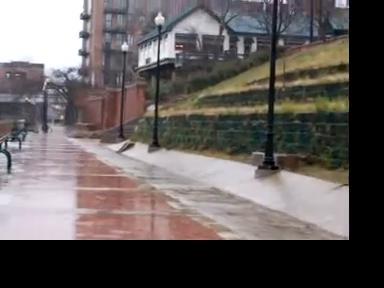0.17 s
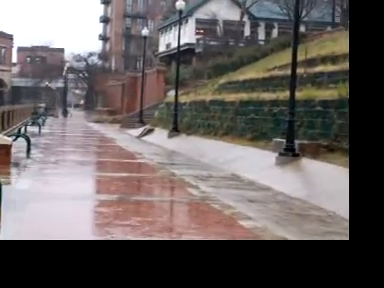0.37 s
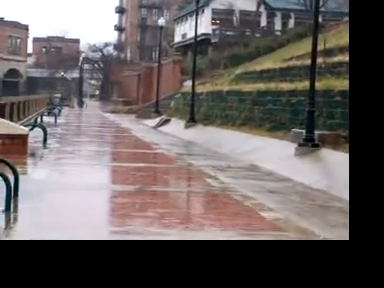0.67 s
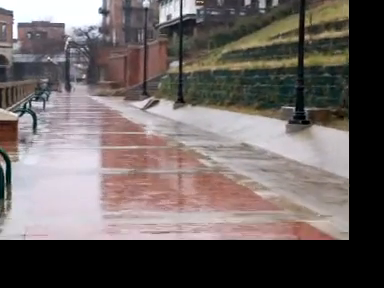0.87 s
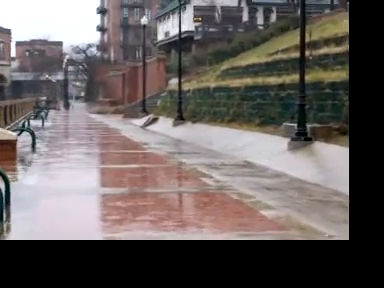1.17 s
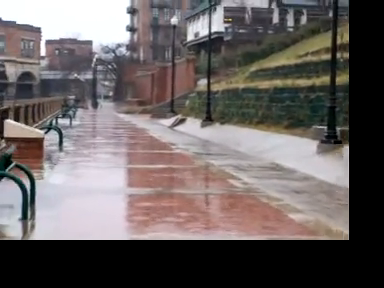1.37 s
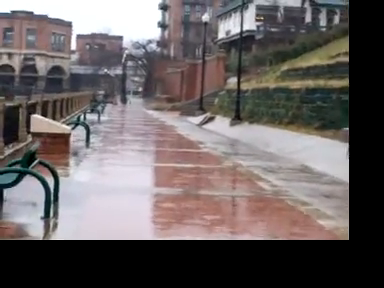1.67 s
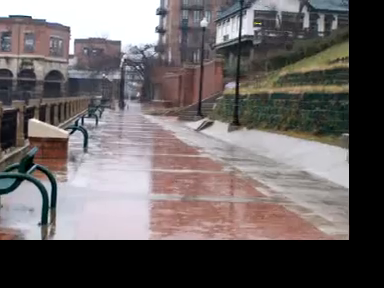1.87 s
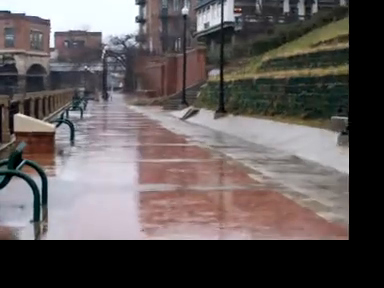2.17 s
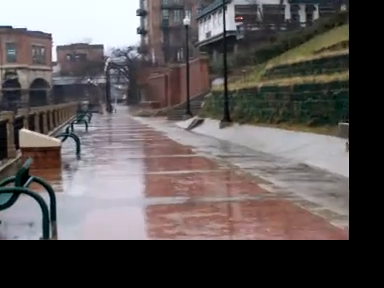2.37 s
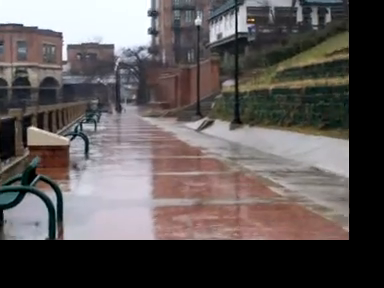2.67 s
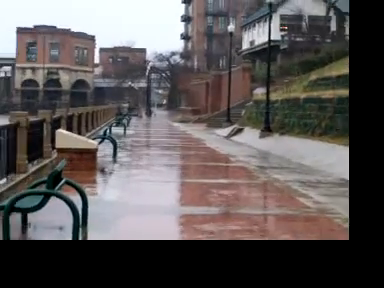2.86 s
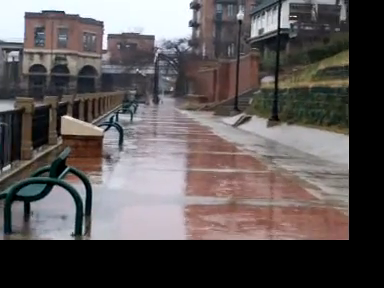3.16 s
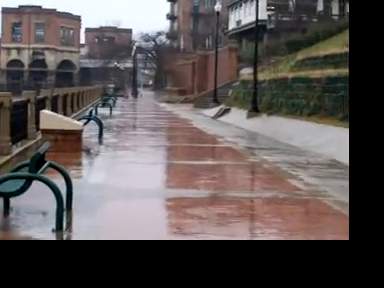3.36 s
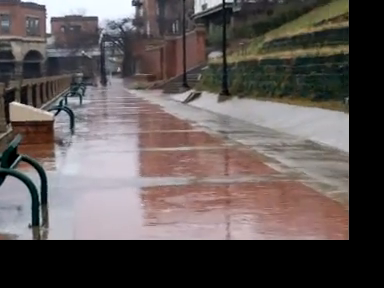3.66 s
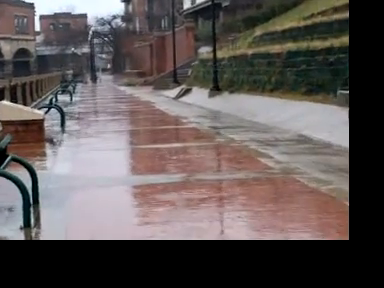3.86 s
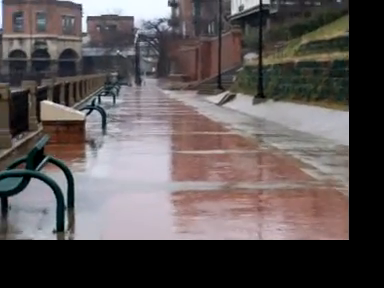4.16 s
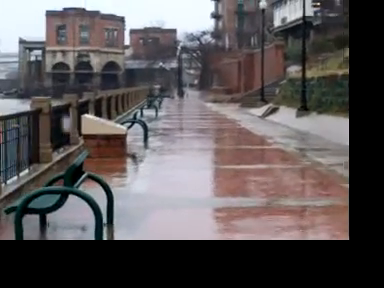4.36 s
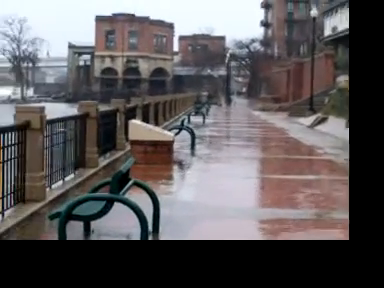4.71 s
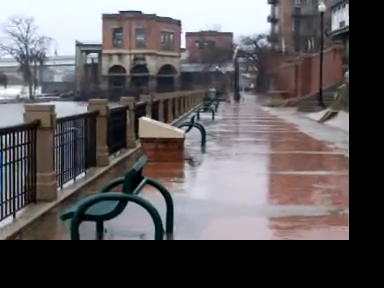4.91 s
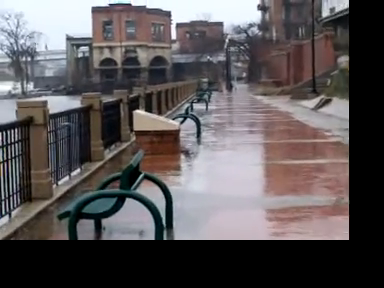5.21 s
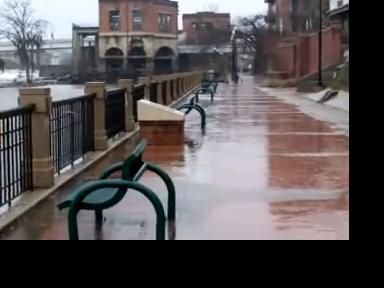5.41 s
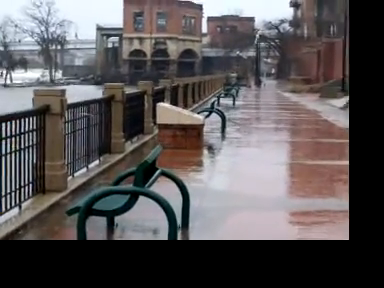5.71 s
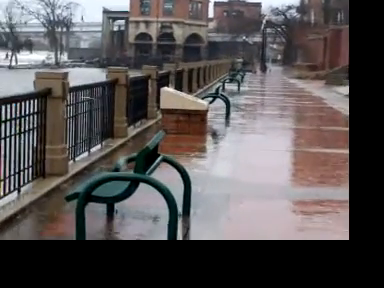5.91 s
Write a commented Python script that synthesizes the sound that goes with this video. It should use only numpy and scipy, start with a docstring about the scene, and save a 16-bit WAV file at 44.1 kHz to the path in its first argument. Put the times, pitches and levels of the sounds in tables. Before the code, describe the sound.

Gusts of wind bump against a slightly dull microphone outdoors as rain patters steadily on wet pavement. Bigger drops tick sharply nearby at irregular moments, above a soft hiss of rain and a faint town rumble. The wind settles to a low breeze with occasional soft thuds, then returns in a cluster of stronger gusts that briefly dip the rain.

```python
"""Steady rain on a paved riverside path: near drops snap on wet stone over the wash of countless far ones.
In the first second gusts rumble and thud on the microphone; lighter ones follow over a low breeze
and a distant town. From 5 s the gusts crowd in and blow hardest, ducking the sound of the rain.
Throughout, a limiter catches the biggest drops and gusts and briefly ducks the rain behind them."""
import sys
import numpy as np
from scipy import signal
from scipy.fft import rfft, irfft, next_fast_len
from scipy.io import wavfile
from scipy.ndimage import uniform_filter1d

SR = 44100
rng = np.random.default_rng(int(sys.argv[2]) if len(sys.argv) > 2 else 0)


def to_wav(s):
    """Save 16-bit WAV."""
    ch = np.atleast_2d(s).T  # columns
    pcm = np.round(np.clip(ch, -1, 1) * 32767)  # PCM
    wavfile.write(sys.argv[1], SR, pcm.astype(np.int16))


N = 266716

# rain as heard, ducked under strong gusts: time_s, level_db
RAIN_LEVEL = [(0, -24.5), (.55, -27.5), (1.2, -25.5), (3.2, -26), (4.9, -26.5), (5.5, -30), (6.05, -26.5)]
# far drops: frequency_hz, density_db
WASH_SPECTRUM = [(60, -10.5), (250, 2.5), (600, 3), (1000, -3.5), (2200, -2), (4000, -6.5), (6000, -3.5),
                 (7200, -13.5), (8500, -12.5)]

def rain(near_db=0.19, wash_db=-9.0, flurry_db=1.04):
    """Near drops come in small flurries; far ones merge to a smooth wash."""
    near = patter() * gain_of(near_db + flurry_db * wander(rate_hz=24))
    far = gain_of(wash_db) * unit_rms(colour(rng.standard_normal(N), WASH_SPECTRUM))
    return gain_of(follow(RAIN_LEVEL)) * (splash_trails(near) + far) + close_drops()


# near drops: frequency_hz, density_db
SPLASH_SPECTRUM = [(150, -14.5), (500, -4.5), (900, -2.5), (1600, -1.5), (2600, 0), (4000, 0), (5500, 1),
                   (7000, 0.5), (8500, -3)]

def patter(rate_per_s=900, nearest_radii=0.14, low_hz=1090, high_hz=6020, cycles=0.28, ring_spread=1.34):
    """Drops land evenly over a disc of pavement and fall off as 1 / distance."""
    draws = rng.random((N, 5))
    out = np.zeros(N)
    for at in np.flatnonzero(draws[:, 0] < rate_per_s / SR):
        _, area, pitch, ring, side = draws[at]
        pitch_hz = low_hz + (high_hz - low_hz) * pitch
        # low drops are dead slaps; some high ones ring briefly in the water film
        wave = snap(pitch_hz, cycles * (1 + ring_spread * pitch * ring ** 2))
        distance = np.sqrt(area + nearest_radii ** 2)
        add(out, at / SR, np.sign(side - .5) * wave / np.linalg.norm(wave) / distance)
    return unit_rms(colour(out, SPLASH_SPECTRUM))


# biggest drops: start_s, level_db, pitch_hz
BIG_DROPS = [(.0206, -9, 4170), (0.1326, -10, 4000), (.2718, -11.5, 4170), (0.617, -10, 3500),
             (0.7135, -18.5, 2900), (.8121, -11.5, 3300), (1.1858, -9.5, 3200), (1.22, -10, 3200),
             (1.2369, -9.5, 4940), (1.366, -12, 2800), (1.438, -9.5, 3400), (1.7308, -8.5, 2880),
             (1.7664, -10.5, 3300), (1.8562, -14, 3750), (1.8948, -9, 3160), (2.1207, -8, 3400),
             (2.14, -8.5, 4500), (2.3725, -9.5, 3400), (2.401, -10.5, 3000), (2.4771, -9, 4160),
             (2.542, -8, 2980), (2.7297, -8.5, 3500), (2.8964, -9, 4430), (2.9812, -9.5, 2720),
             (3.005, -9, 3020), (3.1619, -11, 2830), (3.1777, -5.5, 4430), (3.3337, -11, 4040),
             (3.3683, -7, 2930), (3.422, -20, 3000), (3.5672, -13, 2640), (3.8197, -10, 3730),
             (3.8615, -12.5, 3700), (3.9766, -10.5, 3700), (4.267, -10, 3500), (4.4392, -11, 3500),
             (4.4672, -11, 3880), (4.5816, -8.5, 3500), (4.771, -10.5, 2480), (4.9393, -10, 3930),
             (4.9875, -14, 3200), (5.0021, -9.5, 4200), (5.4533, -10, 2540), (5.7272, -10, 2700),
             (6.017, -17, 3800)]

def close_drops(trim_db=0.16, rebound_db=-5, rebound_s=.0008, spray_db=-23, spray_s=0.007, size=700):
    """Drops beside the microphone: impact, second slap of the splash, short spray."""
    out, t = np.zeros(N), np.arange(size) / SR
    drops = BIG_DROPS + lesser_drops()
    for (start_s, level_db, pitch_hz), noise in zip(drops, rng.standard_normal((len(drops), size))):
        cycles = 0.27 * (pitch_hz / 3400) ** 1.6  # higher drops ring longer
        impact = np.sign(noise[0]) * snap(pitch_hz, cycles, size)
        rebound = gain_of(rebound_db) * snap(pitch_hz * np.exp(noise[2] / 10), cycles)
        add(impact, rebound_s * np.exp(noise[1] / 2), rebound)
        spray = gain_of(spray_db) * noise * np.exp(-t / spray_s)
        splat = colour(impact + spray, SPLASH_SPECTRUM)
        splat *= np.sqrt(SR / 1000) / np.linalg.norm(splat)  # energy of 1 ms at rms 1
        add(out, start_s, gain_of(level_db + trim_db) * splat)
    return out


def lesser_drops(rate_per_s=18, mean_db=-15, spread_db=1.5, centre_hz=3500, spread_oct=0.26):
    """Random close drops, ducked with the rest of the rain under strong gusts."""
    starts = np.flatnonzero(rng.random(N) < rate_per_s / SR)
    chance = np.clip(rng.standard_normal((N, 2))[starts], -2, 2)
    duck_db = follow(RAIN_LEVEL) - follow(RAIN_LEVEL).mean()
    level_db = mean_db + duck_db[starts] + spread_db * chance[:, 0]
    pitch_hz = centre_hz * 2 ** (spread_oct * chance[:, 1])
    return list(zip(starts / SR, level_db, pitch_hz))


def snap(pitch_hz, decay_cycles, size=260):
    """One drop: a sudden push of air that swings out within a cycle or two."""
    turns = pitch_hz * np.arange(size) / SR
    wave = np.sin(2 * np.pi * turns) * np.sqrt(turns) * np.exp(-turns / decay_cycles)
    return wave / abs(wave).max()


def splash_trails(drops, trail_db=-11, decay_s=0.0022, size=900, spots=12):
    """Each splash trails its drop by a few milliseconds, differently from spot to spot."""
    tails = rng.standard_normal((spots, size)) * np.exp(-np.arange(size) / SR / decay_s)
    spot = np.repeat(rng.integers(0, spots, N // size + 1), size)[:N]
    trails = sum(signal.oaconvolve(drops * (spot == k), tail / np.linalg.norm(tail))[:N]
                 for k, tail in enumerate(tails))
    return drops + gain_of(trail_db) * trails


# time_s, level_db
BREEZE_LEVEL = [(0, -27.5), (1.45, -31), (2.3, -26.5), (2.95, -36), (3.5, -27.5), (4.3, -30.5),
                (6.05, -24.5)]
# start_s, length_s, level_db, corner_hz
WIND_GUSTS = [(.09, 0.093, -19, 320), (.25, 0.087, -23, 300), (.38, 0.37, -18.5, 348),
              (1.13, 0.081, -25, 260), (1.97, 0.28, -23, 202), (3.31, 0.11, -24, 250),
              (3.761, 0.099, -21.5, 316), (3.939, 0.065, -19.5, 350), (4.11, 0.058, -24.5, 320),
              (4.541, .04, -25.5, 180), (5.06, .07, -15, 374), (5.18, 0.18, -17.5, 300),
              (5.458, .11, -14.5, 377), (5.629, 0.14, -18, 330), (5.83, 0.13, -19, 344)]

def wind(trim_db=-2, rise_s=0.021, fall_s=0.026, wander_db=3, flutter_db=-16, gale_db=-15):
    """Gusts rise, hold and die away over a low breeze; stronger ones flutter more on their peaks."""
    t = np.arange(N) / SR
    out = gain_of(follow(BREEZE_LEVEL) + trim_db) * turbulence(corner_hz=153.6, slope=4.4, lowest_hz=26)
    flutter = gain_of(flutter_db) * turbulence(corner_hz=1000, slope=5.5, lowest_hz=500)
    for start_s, length_s, level_db, corner_hz in WIND_GUSTS:
        rise = np.clip((t - start_s) / rise_s, 0, 1)
        fall = np.exp(-np.maximum(t - start_s - length_s, 0) / fall_s)
        eddies = turbulence(corner_hz, slope=6.2, lowest_hz=26)
        rumble = gain_of(level_db + trim_db) * rise * fall * eddies
        out += rumble + gain_of(level_db - gale_db) * abs(rumble) * flutter
    return out * gain_of(wander_db * wander(rate_hz=30))


# hardest eddies: peak_s, level_db, centre_hz
EDDY_THUDS = [(.139, -15, 245), (0.178, -11.5, 200), (.488, -8, 230), (.973, -17, 110), (1.025, -16.5, 139),
              (1.284, -12, 90), (1.81, -15, 104), (1.994, -18.5, 130), (2.057, -18, 100), (2.389, -16, 79),
              (3.118, -17, 130), (4.873, -17.5, 69.5), (5.133, -12, 111), (5.248, -11.5, 165),
              (5.326, -8, 74), (5.525, -10, 169), (5.671, -10.5, 170), (5.977, -11, 180)]

def buffets(trim_db=-0.8, width_s=0.0078, tear_db=-13, size=4096):
    """Each eddy is a short, soft thud; the air tears on its pressure peaks, more on harder hits."""
    out, t = np.zeros(N), (np.arange(size) - size / 2) / SR
    swell = np.exp(-.5 * (t / width_s) ** 2)
    for peak_s, level_db, centre_hz in EDDY_THUDS:
        thud = swell * eddy_noise(size, corner_hz=1.06 * centre_hz, slope=4.9, lowest_hz=centre_hz / 3)
        thud *= np.linalg.norm(swell) / np.linalg.norm(thud)
        add(out, peak_s + t[0], gain_of(level_db + trim_db) * thud)
    tear = out ** 2 * turbulence(corner_hz=1000, slope=6.9, lowest_hz=400)
    return out + gain_of(tear_db) * tear


def eddy_noise(size, corner_hz, slope, lowest_hz):
    """Pressure noise, flat from lowest_hz to the eddies' corner, falling steeply above."""
    hz = np.fft.rfftfreq(size, 1 / SR)
    shape = hz / np.hypot(hz, lowest_hz) / np.sqrt(1 + (hz / corner_hz) ** slope)
    return irfft(rfft(rng.standard_normal(size)) * shape, size)


def turbulence(corner_hz, slope, lowest_hz):
    """Continuous eddy noise, rms 1."""
    return unit_rms(eddy_noise(next_fast_len(N, real=True), corner_hz, slope, lowest_hz)[:N])


# frequency_hz, density_db
TOWN_SPECTRUM = [(15, -20), (35, 7.5), (100, -2.5), (200, -2), (350, -21.5), (600, -12.5), (1200, -37),
                 (3000, -65)]

def town(level_db=-39):
    """Steady low rumble from far away."""
    return gain_of(level_db) * unit_rms(colour(rng.standard_normal(N), TOWN_SPECTRUM))


def gain_of(db):
    """Decibels to amplitude."""
    return 10 ** (np.asarray(db) / 20)


def unit_rms(x):
    """Scales to rms 1."""
    return x / np.sqrt(np.mean(x ** 2) + 1e-20)


def follow(curve):
    """Rows of time_s, value, interpolated at every sample."""
    return np.interp(np.arange(N) / SR, *np.transpose(curve))


def add(mix, start_s, sound):
    """Mixes a sound in at start_s."""
    part = mix[max(round(start_s * SR), 0):][:len(sound)]
    part += sound[:len(part)]


def colour(x, spectrum, size=2048):
    """Minimum-phase filter: clicks keep their sharp front."""
    hz, db = np.transpose(spectrum)
    bin_hz = abs(np.fft.fftfreq(size, 1 / SR))
    log_gain = np.log(gain_of(np.interp(np.log1p(bin_hz), np.log1p(hz), db)))
    taps = np.fft.ifft(np.exp(np.conj(signal.hilbert(log_gain)))).real
    return signal.oaconvolve(x, taps)[:len(x)]


def wander(rate_hz):
    """Slow random drift, rms 1."""
    hz = np.fft.rfftfreq(N, 1 / SR)
    return unit_rms(irfft(rfft(rng.standard_normal(N)) / (1 + (hz / rate_hz) ** 4), N))


def low_pass(x, cutoff_hz):
    """Steep band limit."""
    return signal.oaconvolve(x, signal.firwin(201, cutoff_hz, window=("kaiser", 9), fs=SR), "same")


def limiter(x, threshold_db=-5, recovery_db_per_s=55, slope=0.7):
    """Gain drops at once on a peak and creeps back."""
    over_db = slope * np.maximum(20 * np.log10(abs(x) + 1e-9) - threshold_db, 0)
    recovery_db = np.arange(N) * recovery_db_per_s / SR
    held_db = np.maximum.accumulate(over_db + recovery_db) - recovery_db
    return x * gain_of(-uniform_filter1d(held_db, size=31))


def scene():
    """Rain, wind and the distant town, mono."""
    return (rain() + wind() + buffets() + town())[None]


def record(dry, microphone_hz=7100, ceiling=0.7):
    """Dull microphone into a limiter; tips that slip past it clip with a tiny bright tick."""
    dull = signal.sosfilt(signal.butter(N=6, Wn=microphone_hz, fs=SR, output="sos"), dry[0])
    limited = limiter(low_pass(dull, cutoff_hz=8450))
    return low_pass(np.clip(limited, -ceiling, ceiling), cutoff_hz=15900)[None]


dry = scene()
out = record(dry)
to_wav(out)
```